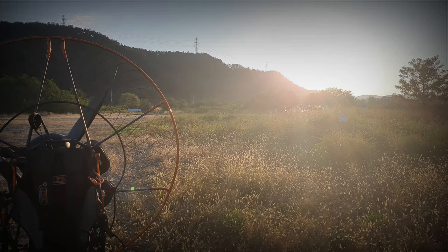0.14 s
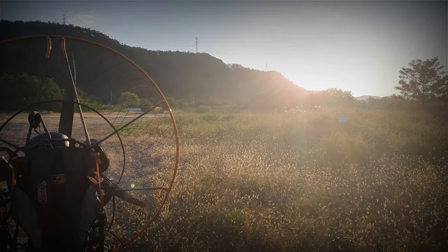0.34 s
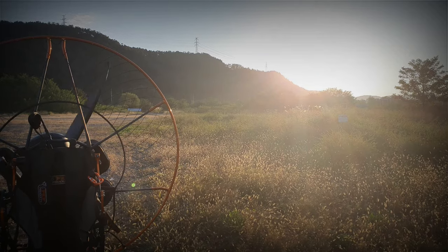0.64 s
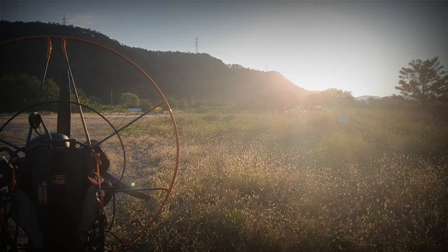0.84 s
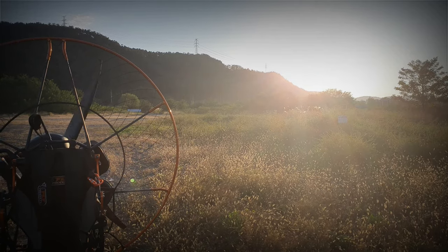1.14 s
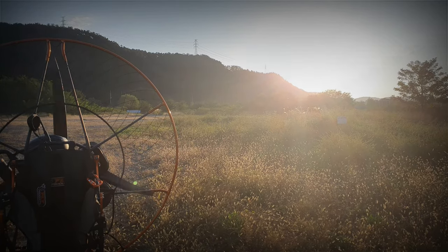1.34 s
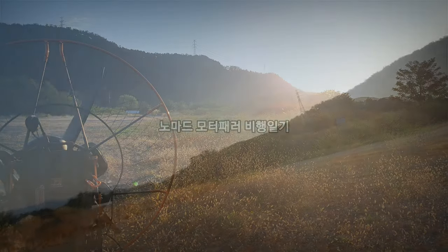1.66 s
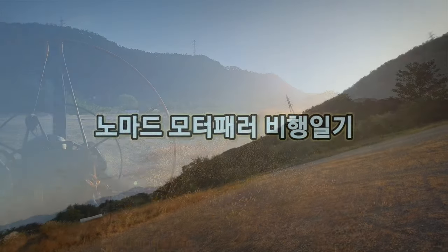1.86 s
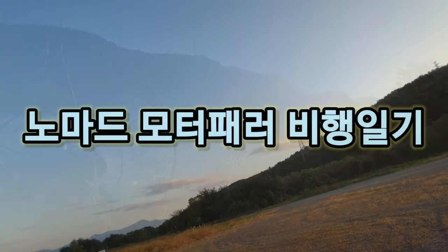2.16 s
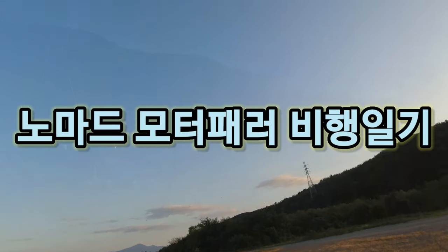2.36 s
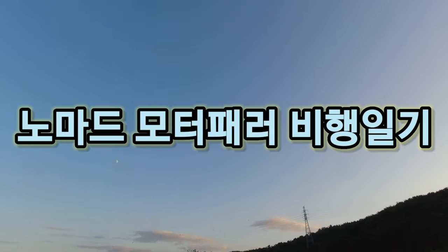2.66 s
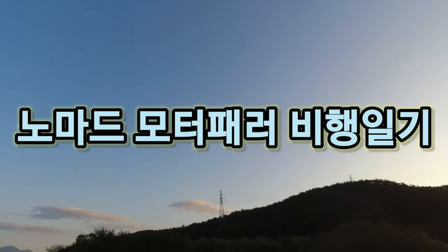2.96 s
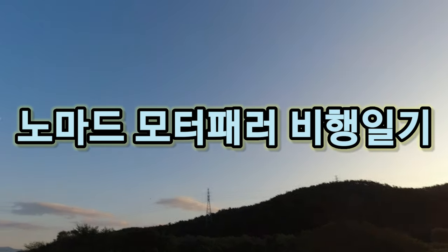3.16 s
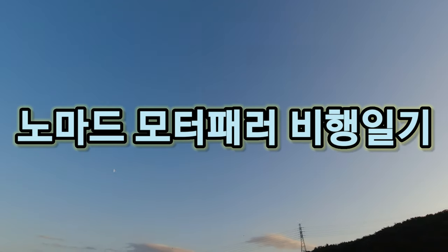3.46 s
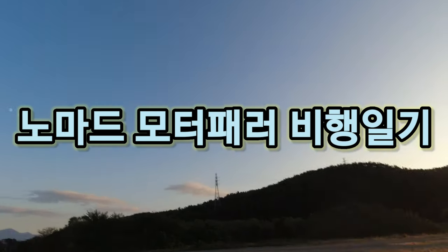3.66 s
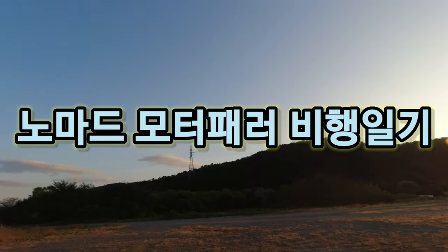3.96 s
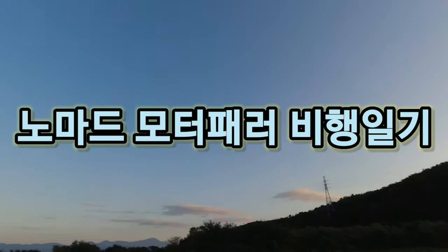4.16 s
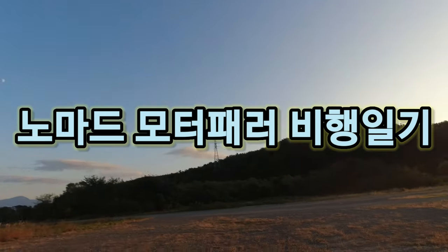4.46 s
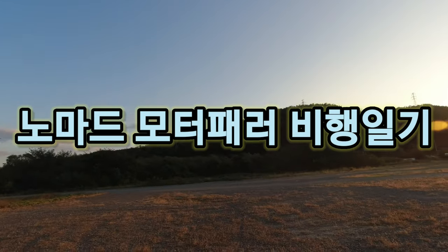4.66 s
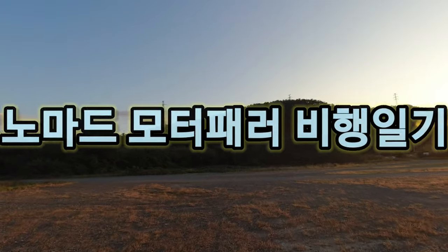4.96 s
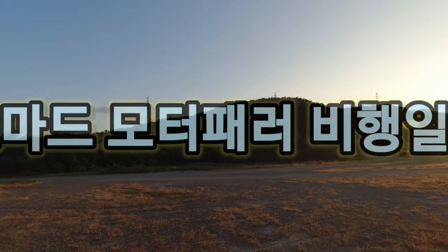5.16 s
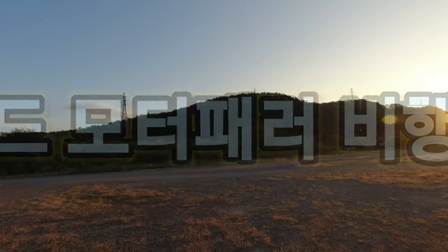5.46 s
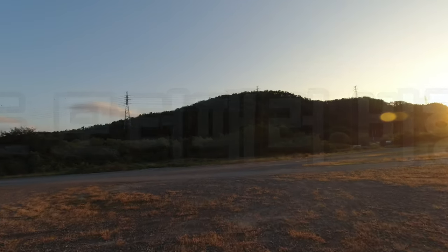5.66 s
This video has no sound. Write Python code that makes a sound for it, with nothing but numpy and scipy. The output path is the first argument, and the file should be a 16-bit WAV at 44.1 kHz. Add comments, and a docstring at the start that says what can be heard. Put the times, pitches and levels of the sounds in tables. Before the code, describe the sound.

Irregular tinny pops and a rattle of piston and gears come from a nearby two-stroke paramotor engine idling outdoors. These blend into a buzzing drone that revs up and grows louder, joined by the rushing hiss of the propeller and some wind rumble on the microphone. A few brief rasps cut through as the engine settles into a strong, slightly wavering run, with a small dip in pitch toward the end.

```python
"""A paramotor idles close by in a field: the two-stroke fires every few turns, ringing its exhaust;
piston and gears clatter in between. From 1.5 s the idle fades into a flight under power.
The engine revs up, its pulse overtones sliding through fixed resonances; a slightly slower drone
beats against it. Propeller roar and wind build. The engine holds a high run, then eases slightly at 5 s."""
import sys
import numpy as np
from scipy import signal
from scipy.fft import rfft, irfft
from scipy.io import wavfile
from scipy.ndimage import uniform_filter1d

SR = 44100
rng = np.random.default_rng(int(sys.argv[2]) if len(sys.argv) > 2 else 0)


def store_wav(level_fs):
    """Save 16-bit WAV to argv[1]."""
    pcm = np.round(np.clip(np.atleast_2d(level_fs), -1, 1) * 32767)
    wavfile.write(sys.argv[1], SR, pcm.T.astype(np.int16))


N = 256220
T = np.arange(N) / SR
IDLE_CRANK_HZ = 37.83  # mean
FADE_START_S, FADE_LENGTH_S, FADE_EXPONENT = 1.514, 0.9, 1.34
CRUISE_S, CRUISE_DB = 4, -17

# idle firings: t/s, level/dB
FIRINGS = [(0.125, -9.5), (0.26, -16.5), (0.375, -9), (0.53, -20.5), (0.613, -12), (0.773, -11),
           (0.926, -11), (1.088, -9.5), (1.26, -17), (1.364, -16.5), (1.47, -12), (1.595, -28),
           (1.648, -21.5), (1.729, -20.5), (1.875, -16), (2.026, -22)]
# idle pumping and clatter, fading out: t/s, level/dB
IDLE_LEVEL = [(.11, -3.5), (.14, 1), (1.15, 1), (1.55, -4), (2.7, -14), (3, -90)]
# exhaust modes: f/Hz, t60/s, fired level/dB, pumped level/dB
EXHAUST_MODES = [(100, 0.068, -16, -17), (160, 0.047, -19, -28.5), (259.7, 0.12, -65, -26),
                 (337, 0.037, -8, -31), (409, 0.019, 1.5, -37), (553, 0.016, -26, -32),
                 (964, 0.13, -15, -48), (1350, 0.087, -20, -25), (1478, 0.064, -6.5, -29.5)]
# piston and gear clatter: f/Hz, density/dB
CLATTER_SPECTRUM = [(150, 8.5), (350, 12.5), (700, 7.5), (950, 8), (1200, 3), (1550, 3.5), (2000, -3),
                    (2800, -2), (3700, -3), (4600, -8.5), (5500, -3), (6600, -6), (7500, -14), (11000, -10),
                    (14000, -16.5)]
# crankcase and cooling fin modes: f/Hz, t60/s, level/dB
CASING_MODES = [(2250, 0.1, -43.5), (2840, 0.075, -41.5), (3593, 0.063, -42.5), (4055, 0.045, -43.5),
                (5120, 0.054, -48), (5490, 0.032, -55)]

# engine speed in flight: t/s, firing rate/Hz
FIRING_RATE = [(1.75, 92.17), (2.0, 98.52), (2.4, 106.9), (2.6, 114.7), (2.72, 119.3), (2.9, 124.2),
               (3.18, 126.7), (3.32, 124.8), (3.6, 124.3), (4.0, 127.1), (4.3, 131.9), (4.5, 134.4),
               (4.85, 134.7), (5.05, 136.4), (5.2, 133.2), (5.45, 134), (5.81, 134)]
# second drone's offset below the engine: t/s, f/Hz
DRONE_OFFSET = [(1.7, 6.85), (2.3, 8.3), (2.6, 6.26), (3.0, 7.44), (3.4, 7.7), (3.95, 6.64), (4.5, 0.615),
                (4.9, 2.46), (5.15, 4.52), (5.8, 6.08)]
# exhaust fundamental: t/s, level/dB
NOTE_LEVEL = [(1.7, -32.0), (2.05, -18.5), (2.33, -16.7), (2.55, -13), (2.8, -10.5), (2.89, -2.5),
              (3.1, -8.5), (3.62, -7), (3.88, -10.5), (4.12, -13.5), (4.28, -6), (4.6, -13.1),
              (4.85, -10.5), (5.0, -16), (5.13, -11), (5.81, -12)]
# pipe resonances, swept by orders 3 and 4: f/Hz, level/dB re roar
PIPE_RESPONSE = [(290, -7), (345, -6.5), (372, -23), (395, -15), (406, -7.5), (450, -8), (490, -5),
                 (506, -1.5), (525, -6.5), (545, -7.5)]
# engine overtones: f/Hz, level/dB re roar
ENGINE_RESPONSE = [(620, -17.5), (800, -17.5), (950, -22), (1070, -11), (1200, -16.5), (1350, -18),
                   (1480, -18), (1750, -13.5), (2130, -14), (2350, -14), (2600, -21.5), (3000, -22.5),
                   (4400, -26), (6500, -24.5)]
# second drone's overtones: f/Hz, level/dB re roar
DRONE_RESPONSE = [(118, -12), (240, -26), (360, -12.5), (490, -14), (590, -7.5), (680, -9), (780, -12.5),
                  (930, -8), (1030, -7.5), (1150, -17.5), (1330, -30), (1550, -12), (1900, -19),
                  (3000, -19.5)]
# swells of hard buzz: t/s, half length/s, level/dB
RASP_SWELLS = [(3.134, 0.0054, -21.5), (3.21, 0.029, -28.5), (3.372, 0.099, -27), (3.757, .045, -25),
               (3.951, 0.026, -26)]
# their colour: f/Hz, density/dB
RASP_SPECTRUM = [(500, -58), (1500, -34), (2300, -27.5), (2850, -30.5), (3600, -36.5), (5000, -54.5),
                 (9000, -62)]
# power driving the roar: t/s, level/dB
POWER_LEVEL = [(2.15, -31.5), (2.35, -28.5), (2.5, -28), (2.6, -24.5), (2.8, -22), (3.08, -16),
               (3.25, -18.5), (3.65, -18), (3.95, -16.0), (4.3, -17), (4.45, -15), (4.55, -17), (5.0, -15),
               (5.3, -15.3), (5.81, -15.5)]
# roar band centres: f/Hz
ROAR_CENTRES_HZ = [750, 2100, 5500, 11000]
# roar per band: cruise level/dB, slope with power/(dB/dB), climb as airspeed builds/(dB/s)
ROAR_LAW = [(-17.5, 1.21, -0.62), (-22.5, 1.1, 0.84), (-40.5, 0.98, 2.5), (-35.5, 0.8, 0.8)]
# propeller turbulence: f/Hz, density/dB re roar
TURBULENCE_SPECTRUM = [(60, -66), (110, -40), (200, -36.5), (330, -40), (550, -40), (1000, -33),
                       (1500, -32.5), (2100, -36), (3000, -33.5), (4000, -31.5), (5500, -33.5),
                       (7500, -39.5), (10000, -34.5), (12500, -39), (15500, -42)]
# wind on the microphone: f/Hz, density/dB
WIND_SPECTRUM = [(10, -66), (25, -64), (42, -51), (70, -63), (120, -45), (300, -83), (1000, -120)]
# stereo width in flight: f/Hz, side level/dB re mid
SIDE_LEVEL = [(60, -12), (130, 5.5), (380, -13), (700, -13.5), (1290, -9), (2380, -4), (4400, 1),
              (8120, -5), (15000, -3)]


def amp(db):
    """Decibels to gain."""
    return 10 ** (np.asarray(db) / 20)


def curve(table, t=T):
    """Table value over time, linearly interpolated."""
    return np.interp(t, *np.transpose(table))


def at_hz(table, hz):
    """Table value on a log frequency axis."""
    f, value = np.transpose(table)
    return np.interp(np.log(np.maximum(hz, 1)), np.log(f), value)


def wander(corner_hz):
    """Low-passed random drift, unit deviation."""
    t = np.linspace(0, T[-1], num=2048)
    hz = np.fft.rfftfreq(len(t), t[1])
    slow = irfft(rfft(rng.standard_normal(len(t))) / (1 + (hz / corner_hz) ** 2))
    return np.interp(T, t, slow / slow.std())


def tinted(white, spectrum):
    """White noise shaped to a spectral density."""
    gain = amp(at_hz(spectrum, np.fft.rfftfreq(N, 1 / SR)))
    return irfft(rfft(white) * gain, N) * np.sqrt(SR / 2)


def clicks(times_s, sizes):
    """Train of single-sample impulses."""
    return np.bincount(np.clip(np.round(times_s * SR).astype(int), 0, N - 1), sizes, N)


def strike(force, response):
    """Force convolved with an impulse response."""
    return signal.oaconvolve(force, response)[:N]


def mode(t, hz, t60_s):
    """Damped sine."""
    return np.sin(2 * np.pi * hz * t) * np.exp(-np.log(1000) * t / t60_s)


def crank_times(coast=0.129):
    """Idle turn times: a firing kicks the crank, which slows until the next."""
    kicks_s = np.r_[0, np.transpose(FIRINGS)[0], np.arange(2.18, 3, .16)]  # even kicks in the fade-out
    turns_s = []
    for start, end in zip(kicks_s[:-1], kicks_s[1:]):
        count = max(round((end - start) * IDLE_CRANK_HZ), 1)
        u = np.linspace(0, 1, count, endpoint=False)
        turns_s.append(start + (end - start) * (u - coast * u * (1 - u)))
    return np.concatenate(turns_s)


def idle_exhaust(pop_db=6, port_delay_s=0.00165, rise_s=0.0011, scatter_db=2, refill_db_per_s=28,
                 echo_db=-12, echo_s=0.00777):
    """Firings bang the exhaust; each turn pumps air through it, harder as fresh charge builds up."""
    fired_s, fired_db = np.transpose(FIRINGS)
    turns_s, t = crank_times(), np.arange(SR // 6) / SR
    bangs = clicks(fired_s + port_delay_s, amp(fired_db + pop_db))
    bangs += clicks(fired_s + port_delay_s + echo_s, amp(fired_db + pop_db + echo_db))  # ground echo
    last_fired_s = np.r_[0, fired_s][np.searchsorted(fired_s, turns_s)]
    refill_s = np.minimum(turns_s - last_fired_s, .16)
    charge_db = refill_db_per_s * (refill_s - refill_s.mean())
    charge_db += scatter_db * rng.standard_normal(len(turns_s))
    pumping = clicks(turns_s + port_delay_s, amp(charge_db)) * amp(curve(IDLE_LEVEL))
    attack = 1 - np.exp(-(t / rise_s) ** 2)
    return sum(strike(bangs * amp(bang_db) + pumping * amp(pump_db), -mode(t, hz, t60_s) * attack)
               for hz, t60_s, bang_db, pump_db in EXHAUST_MODES)


def idle_clatter(clatter_db=-72, slap_db=1, slap_s=0.0027, slap_phase=0.51, play_s=0.0017,
                 scatter_db=3.0, bang_db=12, bang_decay_s=0.025, casing_db=-4):
    """One piston slap a turn over steady gear rattle; firings add a rasp, and the casing rings."""
    turns_s, t = crank_times(), np.arange(SR // 20) / SR
    fired_s, fired_db = np.transpose(FIRINGS)
    late, size = rng.standard_normal((len(turns_s) - 1, 2)).T
    slaps_s = turns_s[:-1] + slap_phase * np.diff(turns_s) + play_s * late
    slaps = clicks(slaps_s, amp(slap_db + scatter_db * size))
    steady = amp(curve(IDLE_LEVEL))
    ticks = steady * strike(slaps, t / slap_s * np.exp(1 - t / slap_s))
    force = steady + strike(clicks(fired_s, amp(fired_db + bang_db)), np.exp(-t / bang_decay_s))
    gears, piston, casing = rng.standard_normal((3, 2, N))
    piston = signal.sosfilt(signal.butter(1, 3000, "high", fs=SR, output="sos"), piston)
    clatter = tinted(force * gears + 2 * ticks * piston, CLATTER_SPECTRUM)
    ring = sum(mode(t, hz, t60_s) * amp(db) / np.sqrt(t60_s * SR / 10) for hz, t60_s, db in CASING_MODES)
    ringing = np.array([strike((force + ticks) * noise, ring) for noise in casing])
    return amp(clatter_db) * clatter + amp(casing_db) * ringing


def idle(right_delay_s=.00032, left_db=1, right_db=-1, cut_hz=55):
    """Left/right idle: the small pipe radiates little deep bass and stands to the left."""
    exhaust = signal.sosfilt(signal.butter(2, cut_hz, "high", fs=SR, output="sos"), idle_exhaust())
    stereo = np.array([exhaust, np.interp(T - right_delay_s, T, exhaust)])
    return (stereo + idle_clatter()) * amp([[left_db], [right_db]])


def fade_in(t):
    """Gain of the flight as it fades in."""
    return np.clip((t - FADE_START_S) / FADE_LENGTH_S, 1e-4, 1) ** FADE_EXPONENT


def flight(engine_db=3.0, drone_db=2, pipe_db=1.1, jitter=.0012, prominence_db_per_hz=0.227):
    """Left/right flight: two close drones in roar and wind; the engine stands out more as it speeds up."""
    engine_hz = curve(FIRING_RATE)
    drone_hz = engine_hz - curve(DRONE_OFFSET)
    prominence_db = prominence_db_per_hz * (engine_hz - engine_hz[T > FADE_START_S].mean())
    turns = np.cumsum(engine_hz * (1 + jitter * wander(32.0))) / SR
    drone_turns = np.cumsum(drone_hz * (1 + jitter * wander(33.6))) / SR
    pipe = overtones(turns, engine_hz, PIPE_RESPONSE, range(3, 5),
                     flutter_db=1.6, flutter_hz=11, smear_rad=0.06)
    engine = overtones(turns, engine_hz, ENGINE_RESPONSE, range(5, 50),
                       flutter_db=4, flutter_hz=9.9, smear_rad=0.16)
    drone = overtones(drone_turns, drone_hz, DRONE_RESPONSE, range(1, 28),
                      flutter_db=3.0, flutter_hz=9.4, smear_rad=0.27)
    buzz = amp(pipe_db) * pipe + amp(engine_db + prominence_db) * engine
    buzz += amp(drone_db - prominence_db) * drone
    note = exhaust_note(turns, turns - drone_turns)
    mid, side = note + buzz + rasps(drone_turns) + propeller_roar(turns) + wind()
    return np.array([mid + side, mid - side]) + propeller_hum(turns)


def exhaust_note(turns, beat_turns, octave_db=-21, octave_follow=0.69, easing_db_per_s=-1.6, drift_db=1,
                 throb_depth=.55, overload_db=-11, side_db=-18, onset_s=1.45, rise_s=0.22):
    """Mid/side fundamental and throbbing octave, plus a third harmonic from recorder overload on peaks."""
    fundamental = amp(curve(NOTE_LEVEL)) * np.clip((T - onset_s) / rise_s, 0, 1)
    power_db = np.minimum(curve(POWER_LEVEL) - CRUISE_DB, 0)  # capped at cruise
    throb = 1 + throb_depth * amp(power_db / 2) * np.cos(2 * np.pi * beat_turns)  # the two drones' beat
    easing_db = easing_db_per_s * np.maximum(T - CRUISE_S, 0)
    octave = amp(octave_db + octave_follow * power_db + easing_db + drift_db * wander(6.1))
    overload = amp(overload_db) * fundamental ** 3
    levels = np.sqrt(2) * np.array([fundamental, octave * fade_in(T) * throb, overload])
    phases = 2 * np.pi * np.outer([1, 2, 3], turns)
    mid = np.sum(levels * np.sin(phases), axis=0)
    quadrature = np.sum(levels * np.cos(phases), axis=0)
    return np.array([mid, amp(side_db) * wander(0.51) * quadrature])


def overtones(turns, hz, response, orders, flutter_db, flutter_hz, smear_rad, dispersion_rad=.25):
    """Mid/side pulse overtones: they slide through fixed resonances and flutter in the propeller wash."""
    out, t = np.zeros((2, N)), T[::256]
    drifts = [wander(flutter_hz) for _ in range(12)]
    cruise_hz = np.median(hz[N // 2:])
    for k in orders:
        picks = rng.choice(len(drifts), size=4, replace=False)
        flutter, smear, side_gain, side_phase = (np.roll(drifts[i], rng.integers(N)) for i in picks)
        level_db = roar_db(k * cruise_hz, t) + at_hz(response, k * hz[::256])
        level = amp(np.interp(T, t, level_db) + flutter_db * flutter)
        phase = 2 * np.pi * k * turns + smear_rad * np.sqrt(k) * smear
        phase -= dispersion_rad * k ** 2  # the pipe spreads each pulse
        out[0] += level * np.sin(phase)
        out[1] += level * amp(at_hz(SIDE_LEVEL, k * cruise_hz)) * side_gain * np.sin(phase + side_phase)
    return out


def rasps(turns, sharpness=1.8, hiss_db=-3, snap_db=-4, side_db=-4):
    """Mid/side swells of buzz: a hard click and a puff of hiss per pulse."""
    swell = sum(amp(db) * np.exp(-((T - at_s) / half_s) ** 2) for at_s, half_s, db in RASP_SWELLS)
    gate = np.exp(sharpness * np.cos(2 * np.pi * turns))
    gate /= np.sqrt(np.mean(gate ** 2))
    snaps = np.diff(np.floor(turns), prepend=0)
    pulses = amp(hiss_db) * gate * rng.standard_normal((2, N)) * amp([[0], [side_db]])
    pulses[0] += amp(snap_db) * snaps / snaps.std()
    return tinted(swell * pulses, RASP_SPECTRUM)


def roar_db(hz, t):
    """Roar level at one frequency: rises with power, brightens with airspeed."""
    cruise_db, follow, climb_db_per_s = (np.interp(np.log(hz + 1), np.log(ROAR_CENTRES_HZ), column)
                                         for column in np.transpose(ROAR_LAW))
    power_db = curve(POWER_LEVEL, t) - CRUISE_DB
    return cruise_db + follow * power_db + climb_db_per_s * (t - CRUISE_S) + 20 * np.log10(fade_in(t))


def propeller_roar(turns, chop=0.13, flicker_db=0.82, patch_db=2.5, trim_db=-1):
    """Mid/side turbulence: swells twice per crank turn; its colour shifts in patches."""
    gate = (1 + chop * np.cos(2 * np.pi * 2 * turns)) * amp(flicker_db * wander(25))
    hz, t, bins = signal.stft(gate * rng.standard_normal((2, N)), SR, nperseg=1024)
    patches = uniform_filter1d(rng.standard_normal(bins.shape[1:]), size=7, axis=0)
    patches = uniform_filter1d(patches, size=8, axis=1)
    patches *= patch_db / patches.std() / (1 + (hz[:, None] / 4500) ** 2)  # top hiss stays even
    level_db = np.array([roar_db(f, t) for f in hz]) + at_hz(TURBULENCE_SPECTRUM, hz)[:, None]
    bins *= amp(level_db + patches + trim_db)
    bins[1] *= amp(at_hz(SIDE_LEVEL, hz))[:, None]
    return np.sqrt(SR / 2) * signal.istft(bins, SR, nperseg=1024)[1][:, :N]


def propeller_hum(turns, gear_ratio=2.93, shaft_db=-23, blade_db=-20, sway_db=3):
    """The geared-down propeller hums at shaft rate and, with two blades, at twice that."""
    angle = 2 * np.pi * turns / gear_ratio
    hum = amp(shaft_db) * np.sin(angle) + amp(blade_db) * np.sin(2 * angle)
    return hum * amp(roar_db(ROAR_CENTRES_HZ[0], T) + sway_db * wander(3.4))


def wind(gust_db=3, side_db=-4, onset_s=2.28, build_s=0.68):
    """Mid/side gusts on the microphone, growing with airspeed."""
    airspeed = np.clip((T - onset_s) / build_s, 0, 1)
    rumble = tinted(rng.standard_normal((2, N)), WIND_SPECTRUM)
    return rumble * airspeed * amp(gust_db * wander(10.0)) * amp([[0], [side_db]])


def scene():
    """The idle gives way to the flight."""
    return idle() + flight()


def record(dry, drive_db=0.38, edge_hz=15850):
    """The microphone rounds off the loudest crests; a low-pass follows."""
    driven = amp(drive_db) * dry
    rounded = driven / (1 + driven ** 4) ** (1 / 4)
    lowpass = signal.firwin(511, edge_hz, window=("kaiser", 9), fs=SR)
    return signal.oaconvolve(rounded, lowpass[None], "same")


dry = scene()
out = record(dry)
store_wav(out)
```